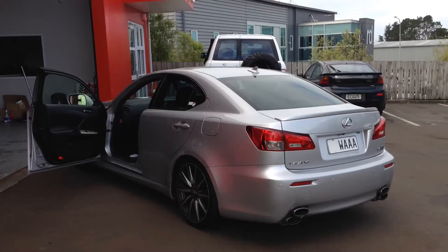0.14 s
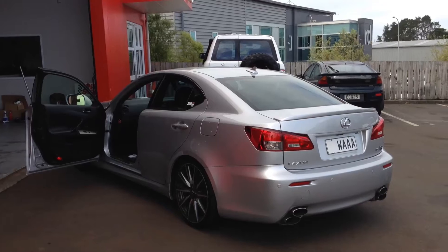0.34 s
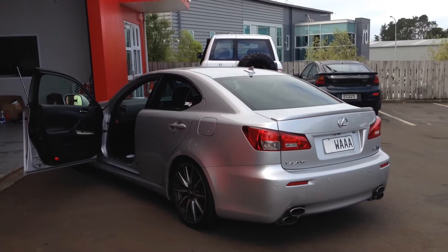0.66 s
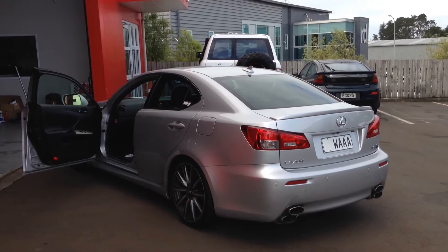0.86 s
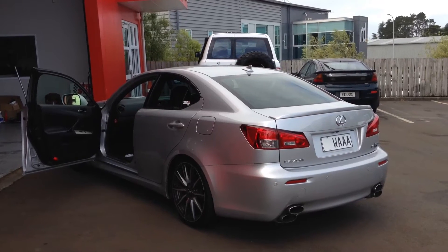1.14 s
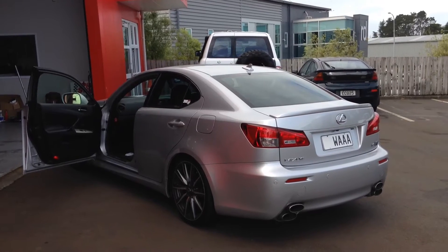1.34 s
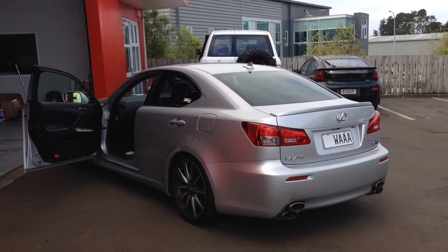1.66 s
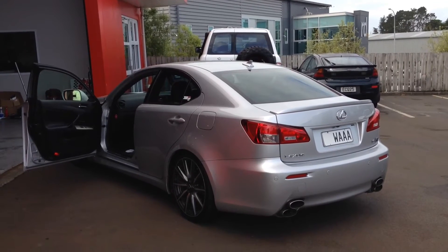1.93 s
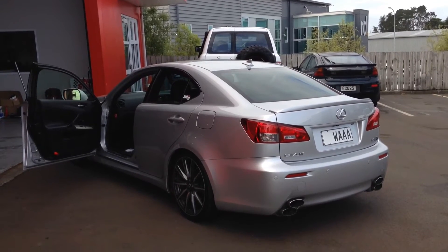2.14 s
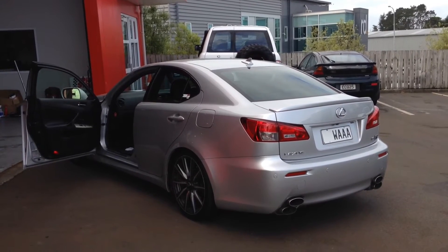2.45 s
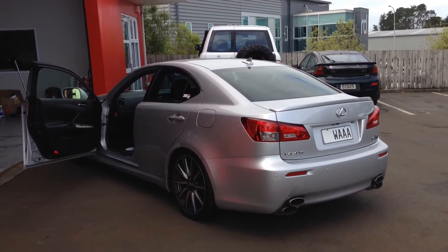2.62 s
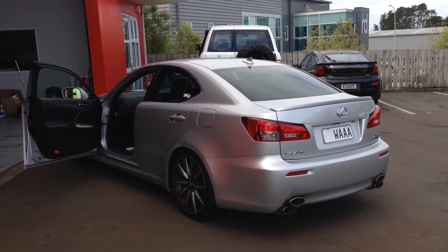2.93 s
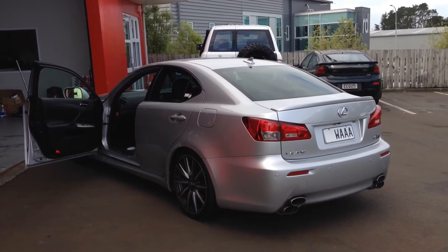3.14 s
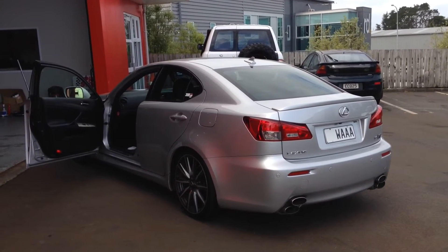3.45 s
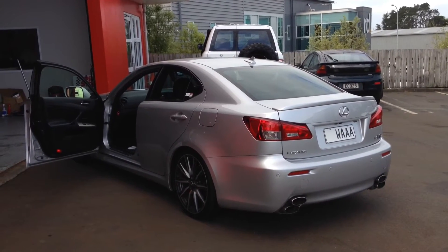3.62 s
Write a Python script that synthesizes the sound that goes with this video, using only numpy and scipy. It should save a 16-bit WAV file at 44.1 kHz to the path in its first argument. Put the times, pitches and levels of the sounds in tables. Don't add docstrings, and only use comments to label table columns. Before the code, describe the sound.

Car engine with open exhaust blips, revs into a stuttering limiter, then blips again outdoors

```python
import sys
import numpy as np
from scipy import signal
from scipy.fft import rfft, irfft
from scipy.io import wavfile
from scipy.ndimage import uniform_filter1d, minimum_filter1d

SR = 44100
rng = np.random.default_rng(int(sys.argv[2]) if len(sys.argv) > 2 else 0)


def generate_wav(sig):
    pcm = np.round(np.clip(np.atleast_2d(sig).T, -1, 1) * 32767).astype(np.int16)
    wavfile.write(sys.argv[1], SR, pcm)


def gain_from_db(level_db):
    decades = np.asarray(level_db, float) / 20
    return 10 ** decades


N = 166698

# (opens [s], shuts [s])
THROTTLE = [
    (0.051, 0.836),
    (1.592, 2.047),
    (3.543, 3.9),
]


def curve(points, values):
    return np.interp(np.arange(N) / SR, points, values)


def unit(x):
    return x / np.sqrt(np.mean(x ** 2))


def walk(rate):
    k = int(SR / rate)
    steps = np.repeat(rng.standard_normal(N // k + 1), k)
    return 1.51 * uniform_filter1d(uniform_filter1d(steps, k), k)[:N]


def ring(x, peaks, flip=True, order=1):
    out = 0
    for k, (hz, width, db) in enumerate(peaks):
        y = x
        for _ in range(order):
            y = signal.lfilter(*signal.iirpeak(hz, hz / width, SR), y)
        out = out + (-1) ** (k * flip) * gain_from_db(db) * y
    return out


def colour(x, spectrum):
    hz, db = np.array(spectrum).T
    f = np.arange(N // 2 + 1) * SR / N + 1
    gain = gain_from_db(np.interp(np.log(f), np.log(hz), db))
    return unit(irfft(rfft(x) * gain, N))


def gate(start, stop, rise, fall):
    t = np.arange(N) / SR
    return np.clip((t - start) / rise, 0, 1) * np.exp(-np.clip(t - stop, 0, 9) / fall)


def air():
    # (frequency [Hz], density [dB per Hz])
    air_spectrum = [(20, -15.5), (60, -1), (150, 2), (600, -20.5), (4000, -47), (15000, -48)]
    swell = gain_from_db(-31 + 1.47 * walk(5.58))
    return swell * colour(rng.standard_normal(N), air_spectrum)


def echoes(dry):
    wall_s, wall_db, yard_t60_s, yard_db = .017, -14.5, 0.53, -11.5
    t = np.arange(SR // 2) / SR
    yard = rng.standard_normal(len(t)) * gain_from_db(-60 * t / yard_t60_s) * (t > .02)
    yard = signal.lfilter([.5], [1, -.5], yard / np.sqrt(np.sum(yard ** 2)))
    wall = np.roll(dry, int(wall_s * SR))
    return gain_from_db(wall_db) * wall + gain_from_db(yard_db) * signal.fftconvolve(dry, yard)[:N]


def thumps():
    # (time [s], level [dB], pitch [Hz], decay [s])
    slaps = [
        (0.159, -6.5, 135.8, .03),
        (0.301, -12, 106.4, 0.029),
        (.385, -7.5, 305, 0.055),
        (1.588, -6, 123, 0.013),
        (2.485, -18.5, 119, 0.013),
        (3.546, -17, 516, 0.023),
        (3.576, -13.5, 1152, 0.007),
    ]
    t = np.arange(N) / SR
    out = 0
    for start, db, hz, decay in slaps:
        envelope = gate(start, start + 0.43 * decay, 0.32 * decay, decay)
        out = out + gain_from_db(db) * envelope * np.sin(2 * np.pi * hz * (t - start))
    return out


def limiter_boom(cut, burst):
    boom = ring(rng.standard_normal(N), [(133, 90, 0), (350, 120, -3)], order=2)
    return gain_from_db(-20) * cut * (0.62 + burst) * unit(boom)


def firings(cycle, scatter_db):
    cylinder_db = [-7.5, -3.5, -6, -2, -5, -1.5, -13, -5.5]
    count = np.floor(cycle * 8).astype(int)
    number = np.arange(count[-1] + 1)
    scatter = scatter_db * rng.standard_normal(N)[:len(number)]
    size = gain_from_db(np.array(cylinder_db)[number % 8] + scatter)
    return size[count], np.diff(count, prepend=0) * size[count]


def tail_tip(x):
    # (frequency [Hz], width [Hz], level [dB])
    tip_modes = [(790, 22, -7), (1063, 61, -6), (1916, 500, -2.5), (2516, 120, -3), (3353, 400, -5),
                 (4240, 190, -5.5), (4790, 350, -1.5), (5980, 63, -6), (7810, 70, -2.5)]
    return x + 1.33 * ring(x, tip_modes, flip=False)


def shell_buzz(clicks, hz):
    # (frequency [Hz], width [Hz], level [dB])
    shell_modes = [(605, 52, 1), (780, 76, -2), (1120, 170, 0.5), (1386, 160, -4), (1810, 570, -6.5)]
    shell = unit(ring(clicks + 0.077 * rng.standard_normal(N), shell_modes, order=2))
    buzz_cycle_hz, spread_hz = 46.8, 2.4
    match = np.exp(-((hz - buzz_cycle_hz) / spread_hz) ** 2)
    return (gain_from_db(-14) + gain_from_db(1.5) * match) * shell


def gas(cycle, hz, bright):
    # (frequency [Hz], density [dB per Hz])
    load_spectrum = [(260, -63), (450, 1), (554, -12), (767, -4), (1180, -4), (1840, -6.5), (2290, -12),
                     (3270, -8.5), (15500, -31.5)]
    coast_spectrum = [(260, -36), (450, -0.5), (605, -6.5), (671, -11.5), (1080, -10), (1920, -14.5),
                      (2820, -18.5), (4400, -25), (15500, -39.5)]
    size, clicks = firings(cycle, scatter_db=0.5)
    pulse = np.exp(-(cycle * 8 % 1) / 0.16)
    puff = (2.8 + size * pulse) * rng.standard_normal(N) + clicks

    crackle_db, crackle_per_s = -3.5, 700
    struck = rng.random(N) < crackle_per_s / SR
    sparks = struck * gain_from_db(6.5 * rng.exponential(size=N)) * np.sign(rng.standard_normal(N))
    buzz = shell_buzz(clicks, hz)

    roar = colour(tail_tip(unit(puff) + gain_from_db(crackle_db) * unit(sparks)), load_spectrum)
    coast = colour(tail_tip(puff), coast_spectrum) + buzz
    rasp = bright * roar + (1 - bright) * coast
    notch_hz, width_hz, share = 2780, 243, 0.59
    return rasp - share * ring(rasp, [(notch_hz, width_hz, 0)])


def silencer(x):
    damped = signal.sosfilt(signal.cheby1(6, 1, 386, fs=SR, output="sos"), x)
    return damped + gain_from_db(-9) * x


def note(cycle, hz, load, burst):
    # (order [per engine cycle], under load [dB], coasting [dB], coasting slope [dB per speed doubling])
    order_db = [(2, -19, -17, 1), (3, -23.5, -9.5, -1.5), (4, -12, -3, 3), (5, -18.5, -11.5, 6.5),
                (6, -8, 1.45, -2.5), (7, -15, -2.5, 4), (8, 0.57, -4, 16.5), (9, -14.5, -7.5, 10),
                (10, -9, -9, -3), (11, -18, -13.5, -7.5), (12, -12.5, -17.5, -1.5), (13, -17, -19, 1),
                (14, -12.5, -26.5, 10), (16, -12, -25, -5)]
    # (frequency [Hz], width [Hz], level [dB])
    hot_pipe = [(71, 39, -15), (139.2, 31.6, -1), (235.6, 46.3, -1.43), (305, 47, -2), (358, 73.5, -3),
                (520, 160, -15.5)]
    cool_pipe = [(70, 60, -21), (139, 26, -6.5), (210.35, 16.5, 8), (268.6, 23, -7), (324.7, 32, -5),
                 (379.2, 34, -3)]
    order, on_db, off_db, slope_db = np.array(order_db).T[:, :, None]
    waves = []
    for k in order[:, 0]:
        flutter = gain_from_db(2.24 * walk(9))
        phase = 0.23 * walk(14) + 6 * rng.random()
        waves.append(flutter * np.sin(2 * np.pi * k * cycle + phase))
    waves = np.array(waves)
    rumble = colour(rng.standard_normal(N), [(20, -24.5), (100, -8), (500, -4), (900, -22.5)])

    tip_in = gain_from_db(-1) * sum(gate(a, a + 0.031, 0.0056, 0.13) for a, b in THROTTLE[2:])
    hot = load * ((gain_from_db(on_db) * waves).sum(0) + gain_from_db(-11.5) * rumble)
    hot = hot + (gain_from_db(3.5) * burst + tip_in) * rumble

    mid_cycle_hz = 40
    coast_db = off_db + slope_db * np.log2(hz / mid_cycle_hz)
    coast = (gain_from_db(coast_db) * waves).sum(0) + gain_from_db(-19.5) * rumble
    cool = ring((1 - load) * coast, cool_pipe, flip=False, order=2)
    return ring(hot, hot_pipe) + silencer(cool)


def scene():
    # (time [s], engine cycles [Hz])
    speed = [(.12, 17.1), (.26, 16.2), (.35, 17.2), (.57, 27.6), (.75, 36.7), (.85, 39.2), (.96, 36.9),
             (1.06, 36.4), (1.56, 27.6), (1.65, 29.6), (1.88, 46.4), (2.05, 56.9), (2.5, 56.6),
             (2.65, 53.4), (3.05, 43.8), (3.52, 34.5), (3.59, 36.8), (3.78, 50.8)]
    # (time [s], exhaust note [dB], gas flow [dB])
    effort = [(.12, -9, -43.5), (.27, -13.5, -44), (.33, -3.5, -42), (.58, -2.5, -31), (.75, -5, -26),
              (.85, -4, -34.5), (1.0, -10, -32), (1.55, -6, -37), (1.66, -3, -31.5), (1.769, -5, -18.5),
              (1.92, -6.5, -13.5), (2.05, -4.5, -9.5), (2.5, -9, -15), (2.62, -11, -26), (2.9, -3.5, -29),
              (3.521, -6, -32.5), (3.602, -6, -17), (3.78, -10.5, -18.5)]
    # (fuel returns [s], length [s], level [dB])
    limiter = [
        (2.08, .024, 1),
        (2.138, .024, -1),
        (2.191, .024, 0),
        (2.251, .027, -1),
        (2.314, .024, 0),
        (2.367, .026, 0),
        (2.426, .022, .3),
        (2.488, .03, -11),
    ]
    s, note_db, gas_db = np.array(effort).T
    hz = curve(*np.array(speed).T)
    cycle = np.cumsum(hz) / SR

    burst = sum(gain_from_db(db) * gate(a, a + length, 0.0082, 0.0031) for a, length, db in limiter)
    cut = gate(2.047, 2.518, 0.011, .06)
    valve = sum(gate(a, b, .02, .04) for a, b in THROTTLE)
    load = np.clip(valve * (1 - cut) + burst, 0, 1)

    note_level = gain_from_db(curve(s, note_db)) * (gain_from_db(-5.5 * cut) + gain_from_db(-35) * burst)
    low = note(cycle, hz, load, burst) * note_level
    flow_db = curve(s, gas_db)
    gas_level = gain_from_db(flow_db - 15 * cut + .8 * walk(13)) + gain_from_db(-12) * burst
    dull_below_db, bright_span_db = -21.5, 14.5
    bright = load * np.clip((flow_db - dull_below_db) / bright_span_db, 0, 1)

    dry = low + limiter_boom(cut, burst) + gas(cycle, hz, bright) * gas_level + thumps()
    return (dry + echoes(dry) + air())[None]


def band_limit(x):
    return signal.sosfilt(signal.butter(12, 15950, fs=SR, output="sos"), x)


def record(dry):
    start_s, limit_db, hold_s, top_hz = .1195, 1.2, 0.0063, 15700
    click = gain_from_db(-36.5) * gate(start_s, start_s, 1 / SR, 0.00071) * rng.standard_normal(N)
    x = gain_from_db(1) * dry + click
    hold = int(hold_s * SR)
    room = minimum_filter1d(np.minimum(1, gain_from_db(limit_db) / (np.abs(x) + 1e-9)), 2 * hold)
    x = x * uniform_filter1d(room, hold) * (np.arange(N) > start_s * SR)
    x = signal.sosfilt(signal.ellip(8, .2, 70, top_hz, fs=SR, output="sos"), x)
    return band_limit(x)


dry = scene()
out = record(dry)
generate_wav(out)
```